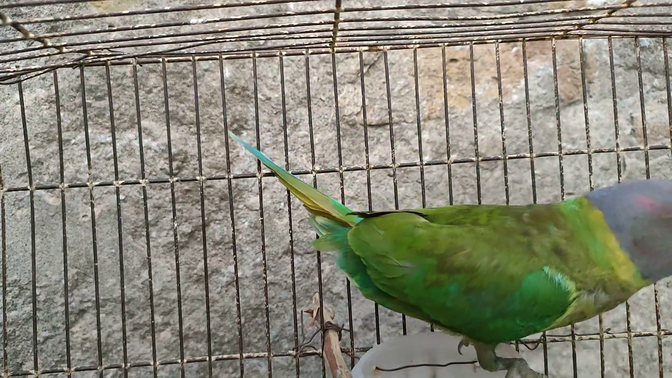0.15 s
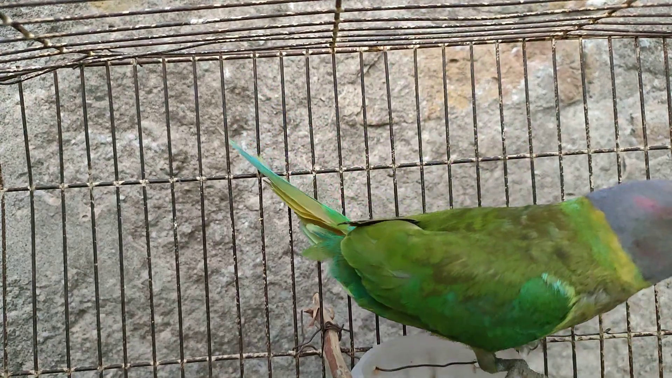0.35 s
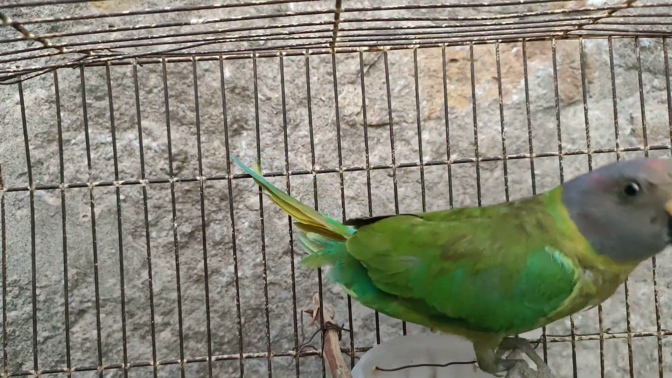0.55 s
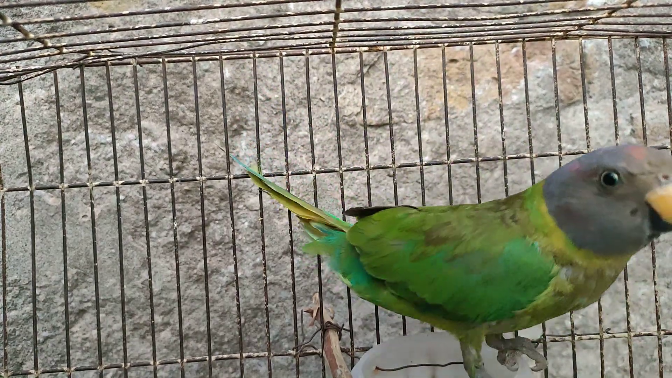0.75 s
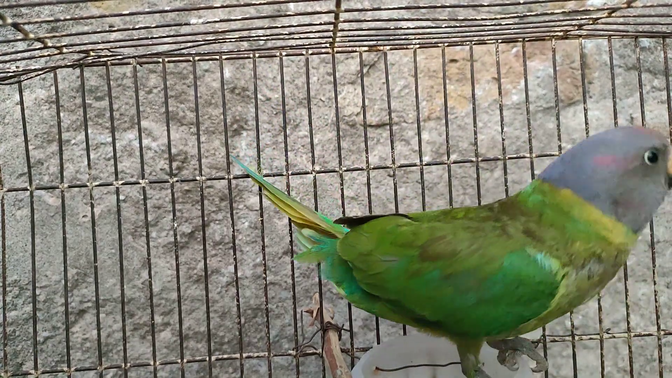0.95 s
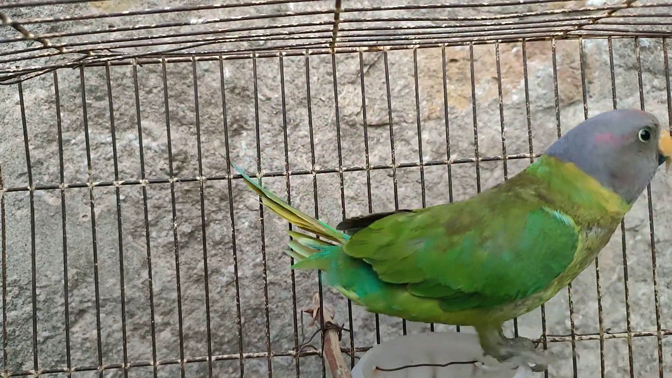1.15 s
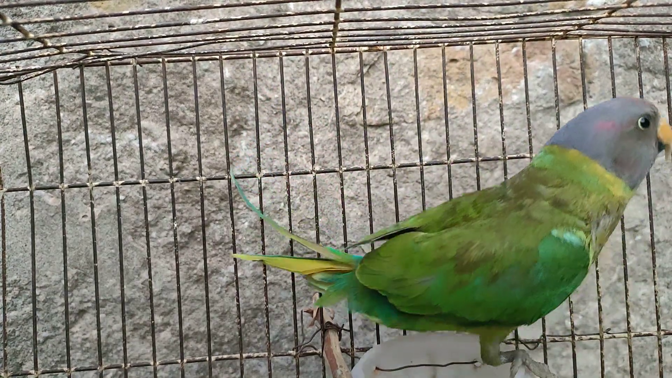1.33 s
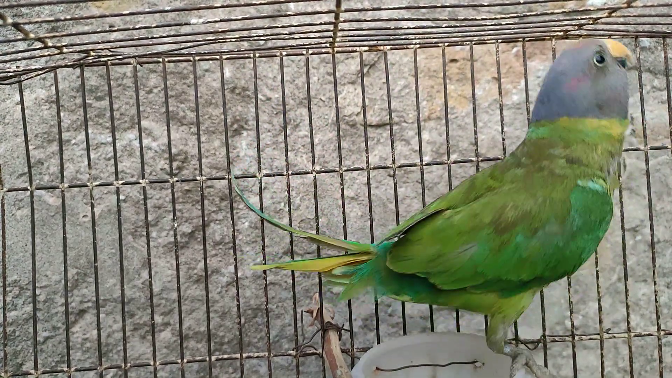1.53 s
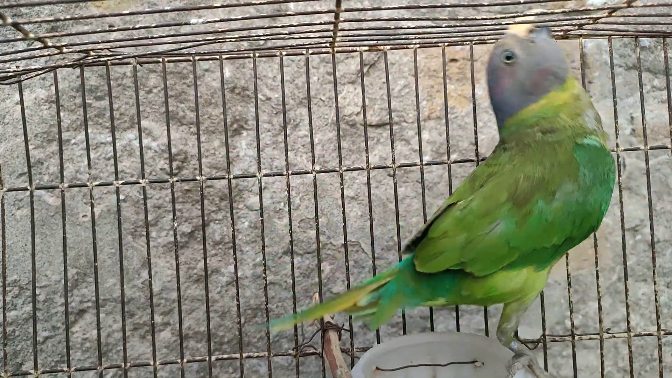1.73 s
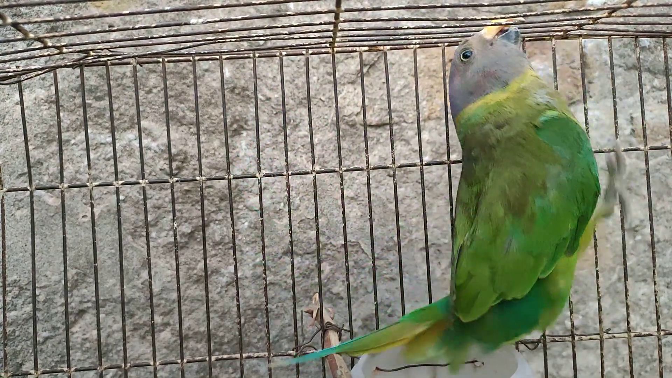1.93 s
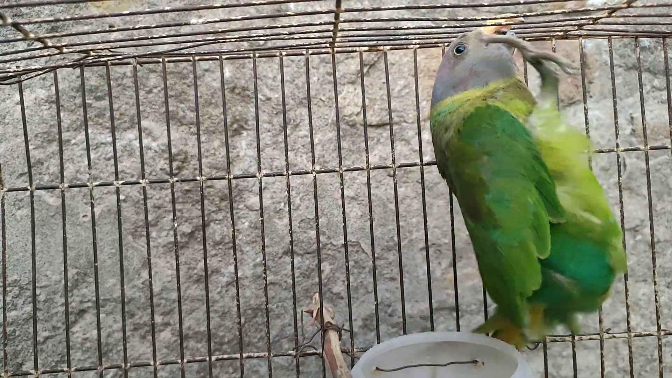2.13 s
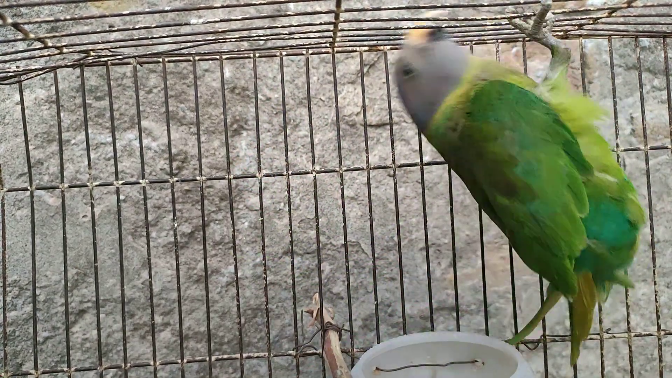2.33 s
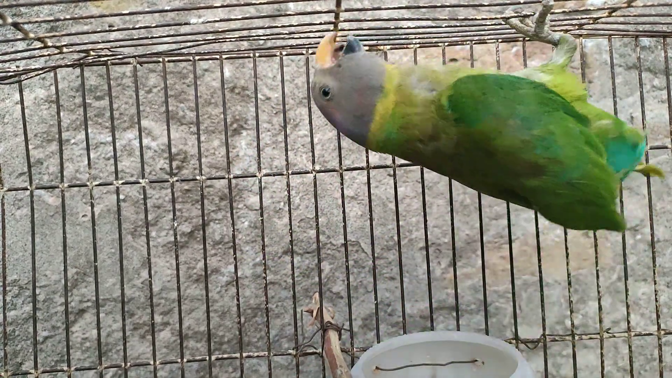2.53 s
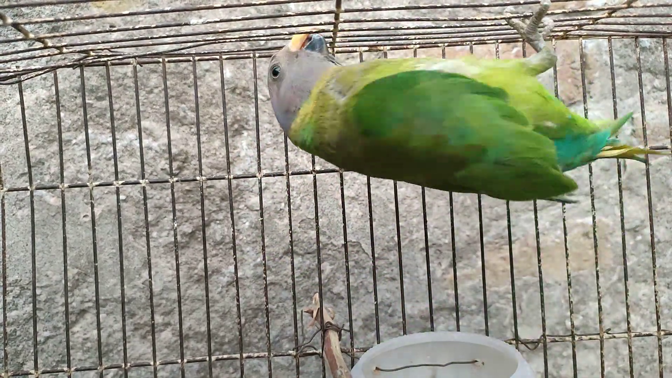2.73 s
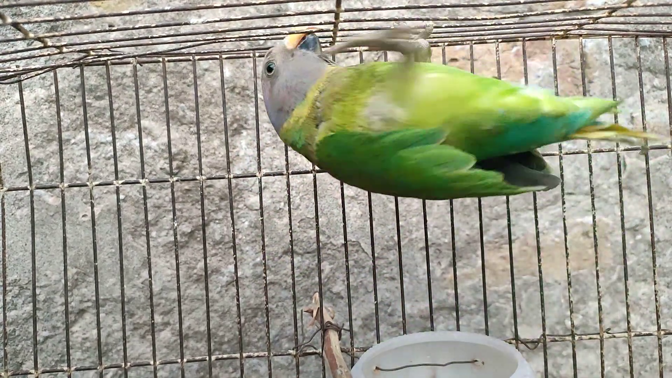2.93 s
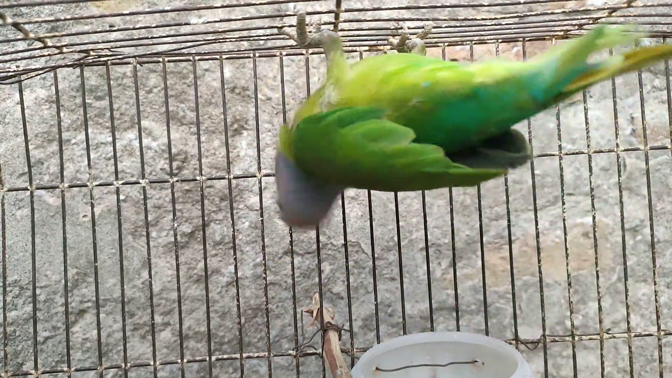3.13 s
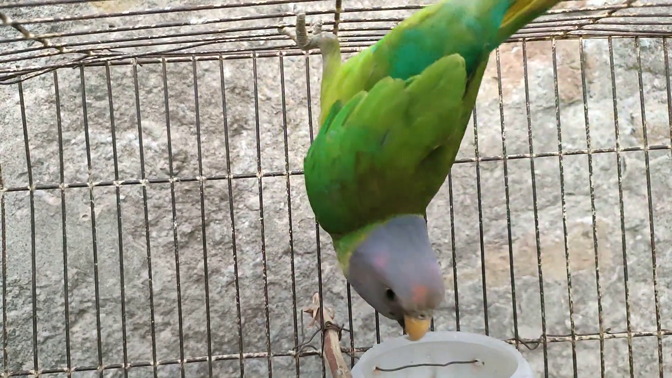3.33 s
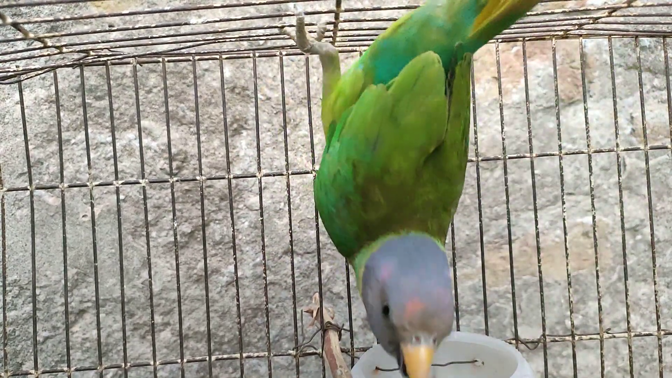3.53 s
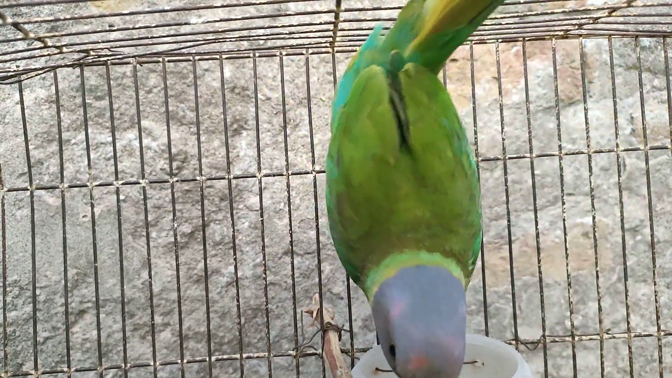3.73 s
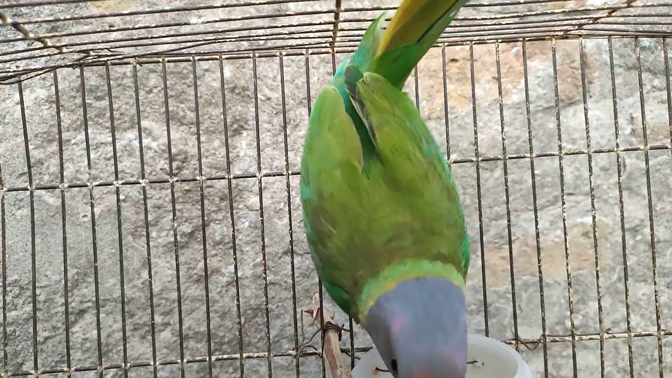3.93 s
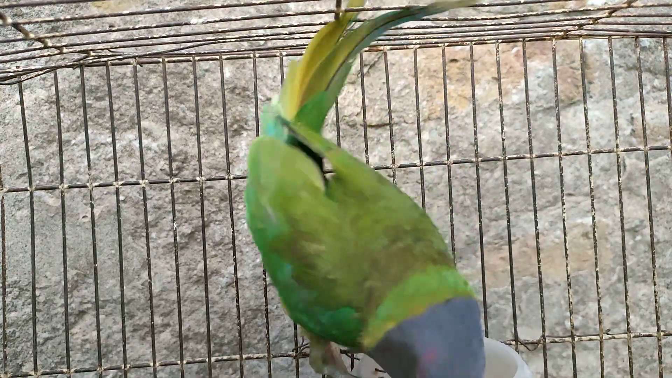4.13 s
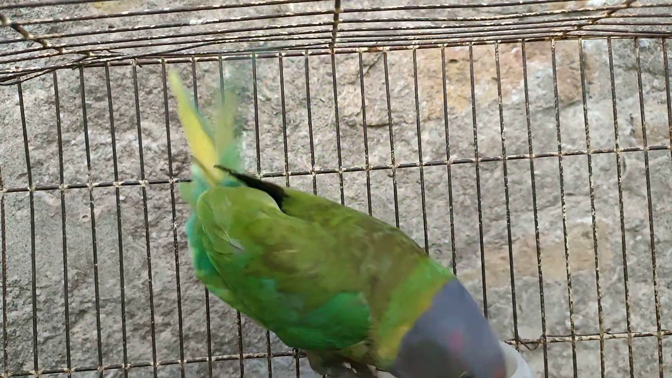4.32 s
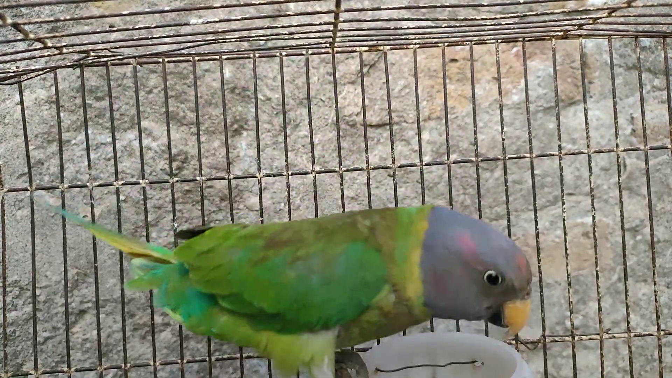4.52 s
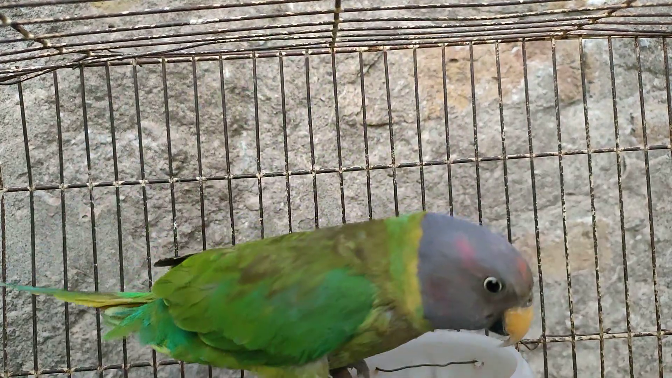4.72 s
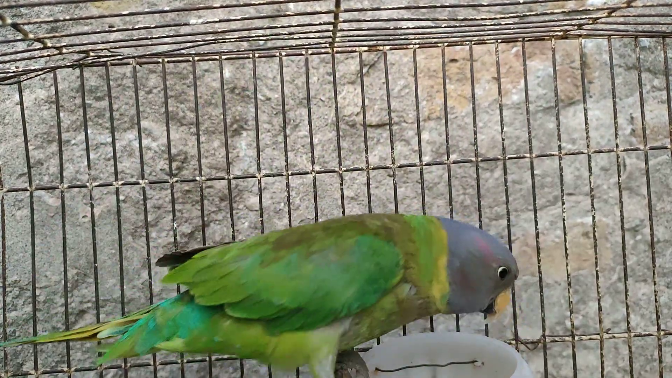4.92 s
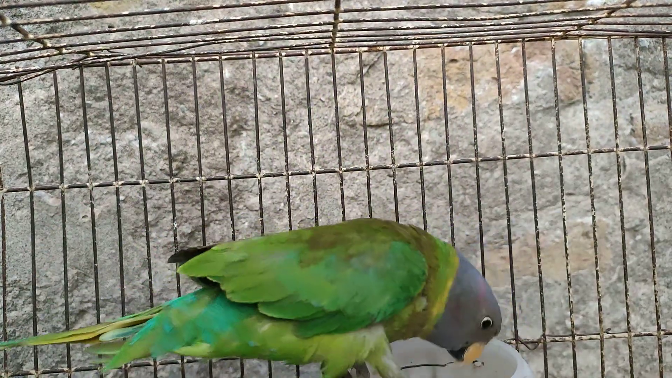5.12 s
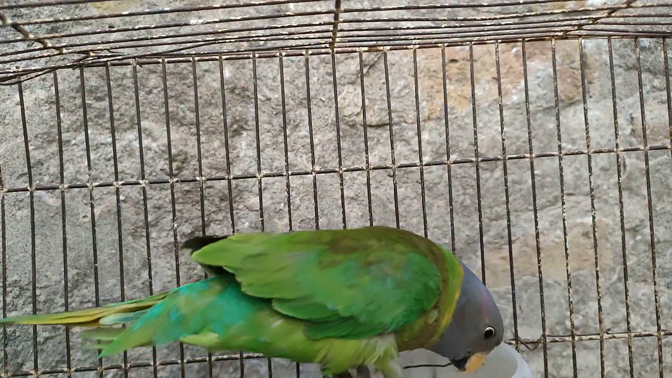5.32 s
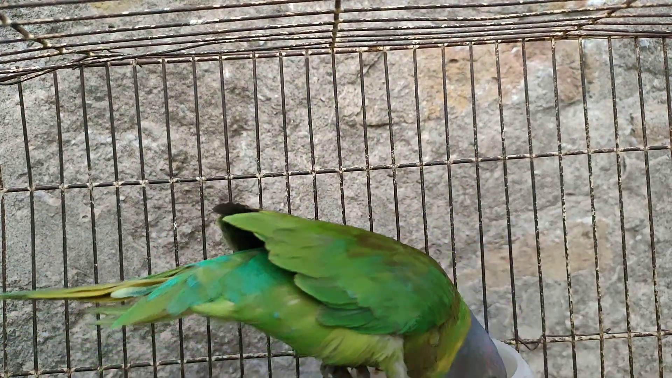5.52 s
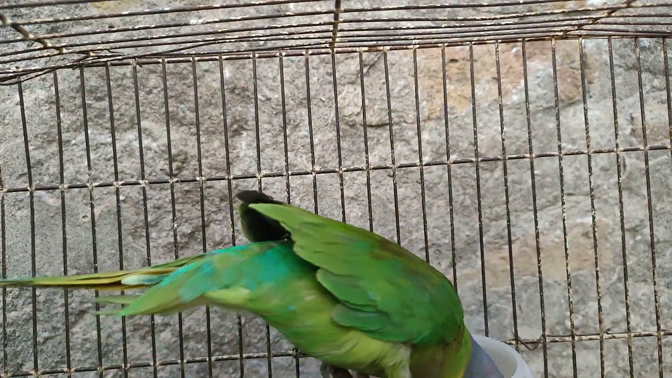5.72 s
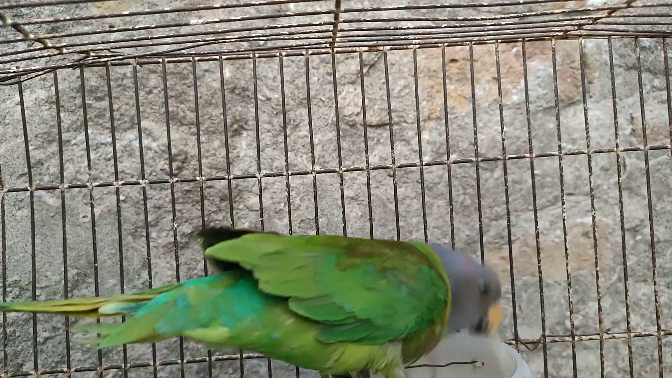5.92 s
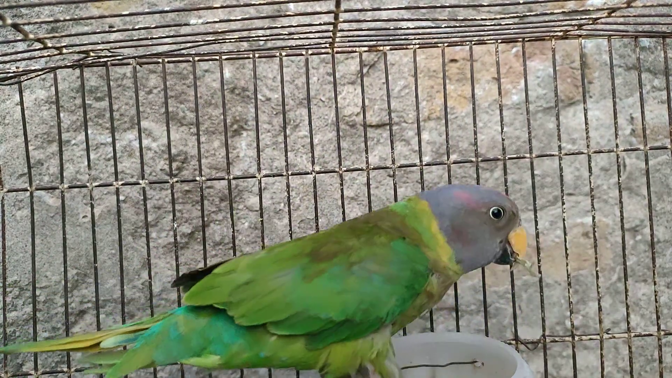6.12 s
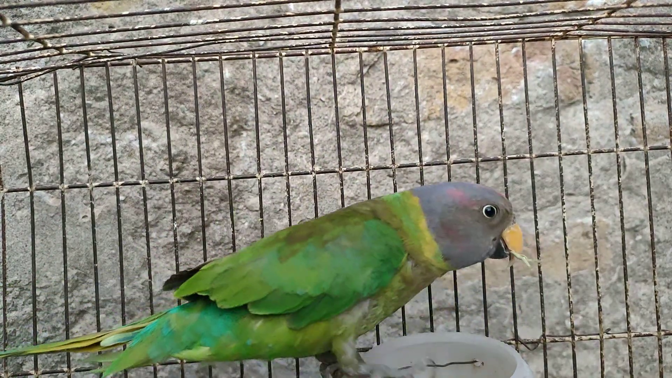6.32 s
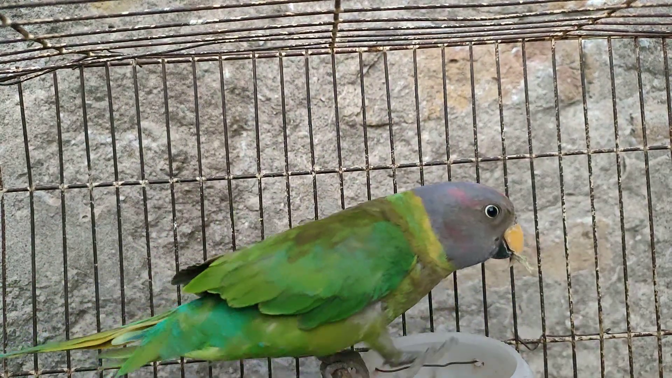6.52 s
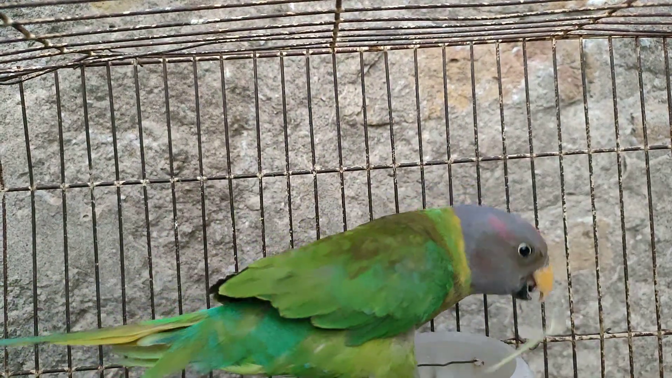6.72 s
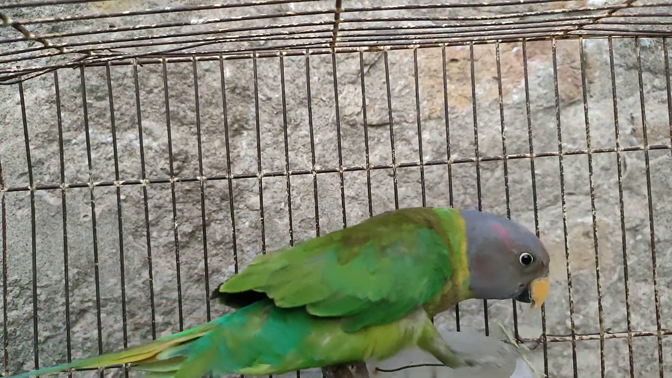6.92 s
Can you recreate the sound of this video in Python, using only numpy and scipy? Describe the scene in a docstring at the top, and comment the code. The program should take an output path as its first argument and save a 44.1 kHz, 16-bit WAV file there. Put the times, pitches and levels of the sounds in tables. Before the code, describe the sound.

Close, fairly dry metallic ticks and soft scratches come from a parakeet climbing the bars of its cage. Light clicks give way to rubbing on ringing wires, then a few firm knocks, and after a pause, quick clusters of ticks. Underneath, a deep hum grows through the middle and eases back. Brief, thin chirps from a small bird a little way off sound over quiet outdoor air.

```python
"""Sharp ticks and scratchy scuffs on wire: a parakeet climbs round its cage, close by, before a stone wall.
Beak and claws strike the wires and set bars and frame ringing; feet and feathers rub along them in tiny
slips, and one claw skids down a bar. Further off, a small bird whistles two phrases twice each, and a
very distant call arrives as echoes. Underneath, a low hum swells during the climb over a faint outdoor
wash."""
import sys
import numpy as np
from scipy import signal
from scipy.fft import rfft, irfft
from scipy.io import wavfile
from scipy.ndimage import uniform_filter1d

SR = 44100
rng = np.random.default_rng(int(sys.argv[2]) if len(sys.argv) > 2 else 0)


def dump_mix(stems):
    """Bounce the given channels to the path in sys.argv[1] as a 16-bit WAV at rate SR."""
    frames = np.atleast_2d(stems).T  # one column per channel
    limited = np.clip(frames, -1, 1)  # hard clip at full scale
    pcm = np.round(limited * 32767).astype(np.int16)
    wavfile.write(sys.argv[1], SR, pcm)


N = 311346
TIME = np.arange(N) / SR

# Beak and claw strikes:
# (time [s], strength [dB], weight [0-1], wire note [Hz], extra tick [dB], left over right [dB])
STRIKES = [(0.3083, -39.5, 0.17, 5620, -3, 2), (0.6368, -33.5, 0.12, 5710, 2, -0.5),
           (0.829, -43, 0.25, 5600, -8, 0), (0.8475, -48.5, 1, 5400, 6, 1), (0.854, -62, 0.65, 5500, 4, -2),
           (0.867, -31.5, 0.09, 5400, 0, 0), (1.2045, -51, 0.25, 6200, -4, 0),
           (1.3332, -56, .2, 5630, 7, -2), (1.3374, -35.5, 0.15, 5850, 5, 0),
           (1.3866, -41, 0.36, 4200, -2, 4), (1.395, -51, 0.45, 5200, -3, -6),
           (1.8313, -41.5, 0.85, 5150, 1, 2), (1.977, -52.5, 0, 5920, 6, -4),
           (3.7333, -27.5, 0.9, 3900, -1, 1), (3.764, -45, 1, 4840, 6, 0), (3.7836, -46, 0.56, 5170, 2, 2),
           (3.7876, -33.5, 0.87, 5340, 1, 2), (3.8036, -26.5, 0.67, 3750, -2.5, 1),
           (4.079, -58, 0.6, 5600, 15, 0), (4.235, -34, 0.82, 4500, 7, 1.5),
           (4.3178, -20, 0.83, 4740, -3, 2.5), (4.388, -50, 0.33, 5500, 3, 0),
           (4.41, -49, .25, 5400, -1, 0), (4.457, -43.5, 0.31, 3780, 7, 1.5),
           (4.493, -31, 0.24, 5500, 1.5, 0.5), (4.582, -52, 0.5, 5650, 8.5, 4),
           (5.2787, -42, 0.15, 5340, -1, 1), (5.765, -54.5, 1, 3950, -5, 8), (6.0395, -54, 0.1, 5800, 4, 2),
           (6.055, -40, 0.1, 5670, 1, 1), (6.063, -39.5, 0.33, 5040, -4, 2),
           (6.0717, -42, 0.27, 5700, 0, 2), (6.081, -38, 0.24, 6030, 3, 1), (6.109, -46, 0.2, 5800, -3, -3),
           (6.114, -42, 0.1, 5660, -4, 8), (6.1375, -34, 0.04, 5700, -0.5, 2),
           (6.1513, -38.5, 0.34, 6100, 0, -1), (6.7448, -37.5, 0.52, 3930, -1.5, 4.5),
           (6.778, -46.5, 1, 3600, 2, 11), (6.788, -59, 0.5, 5000, 9, 4), (6.929, -40.5, 0.4, 5200, -6, -2),
           (6.9403, -40, 0.76, 4730, -1, -3), (6.9535, -40.5, 0.46, 4900, 1.5, 0)]
# Light strikes ring one wire, firmer ones clack the bars, heavy ones knock the frame:
# (weight [0-1], wire ring [dB], bar clack [dB], frame knock [dB], tick [dB], rattle [dB])
STRIKE_MIX = [(0, 1, -17.5, -28.5, -17, -34), (.5, -5.5, -0.5, -16, -15, -25),
              (.8, -10.5, -3, -9.5, -25, -13), (1, -14, -3, -1.5, -27, -14)]

def strikes(chatter_s=0.0042, chatter_gain=0.27, buzz_s=0.014, buzz_db=-27, detune=0.0051,
            note_width_hz=650, note_db=7.0, damping_db=12, rattle_s=0.022, size=8192):
    """A snap and brief chatter set wire, bars and frame ringing; heavy strikes leave the bars rattling."""
    out, t, hz = np.zeros((2, N)), np.arange(size) / SR, np.fft.rfftfreq(size, 1 / SR)
    wire_band, bar_band = band(hz, 5260, 6370, 12.6, 15.4), band(hz, 3380, 4930, 3.6, 9.3)
    frame_band, tick_band = band(hz, 800, 2100, 1.1, 5.0), band(hz, 7080, 8700, 6.8, 2.9)
    rattle_band = band(hz, 4550, 5700, 10.7, 21.5)
    chatter = chatter_gain * (np.exp(-(t / chatter_s) ** 1.44) + amp(buzz_db) * np.exp(-t / buzz_s))
    attack_samples = SR // 110
    for at_s, strength_db, weight, note_hz, tick_db, left_db in STRIKES:
        drive = stereo_noise(size, shared_gain=0.67) * chatter
        snap = np.interp(weight, [0, 1], [2.6, 1.2])  # light claws snap most sharply
        drive[[0, 1], rng.integers(0, 5, 2)] += snap
        wires = cage_response(hz, detune, ripple_db=1.5, spacing_hz=197.6)
        # The claw damps its wire to a broad note, more so under weight.
        wires *= resonances([(note_hz, note_width_hz, note_db - damping_db * weight)], hz)
        *parts_db, rattle_db = strength_db + touch_levels(STRIKE_MIX, weight) + [0, 0, 0, tick_db, 0]
        pan = amp([[left_db / 2], [-left_db / 2]])
        for part, db in zip([wire_band, bar_band, frame_band, tick_band], parts_db):
            tone = ring(drive, part * wires)
            attack_rms = rms(tone[:, :attack_samples], axis=1, keepdims=True)
            add(out, at_s, amp(db) * pan * tone / attack_rms)
        shake = rng.standard_normal((2, size)) * amp(-drift(size, 250))
        rattle = unit_rms(ring(shake, rattle_band * wire_ripple(hz, 5.5, 130)))
        add(out, at_s, amp(rattle_db) * pan * rattle * np.exp(-t / rattle_s))
    return out


# Cage resonances: (frequency [Hz], width [Hz], peak gain [dB])
CAGE_MODES = [(667, 170, 2.5), (1105, 110, 19), (1420, 62, 12), (1640, 130, -9.5), (2960, 180, 7.5),
              (3350, 110, -1), (3930, 300, 9), (4530, 150, -0.5), (4740, 260, 2), (4940, 110, 5),
              (5250, 140, 6), (5630, 300, 6), (5950, 270, -1.5), (6970, 600, 1.5), (7800, 160, -9),
              (9870, 430, 0), (11300, 1200, -6.5)]

def cage_response(hz, detune, ripple_db, spacing_hz):
    """The cage's modes and those of the touched wire; no two wires are tuned alike."""
    detuned_hz = hz * (1 + detune * rng.standard_normal())
    return resonances(CAGE_MODES, detuned_hz) * wire_ripple(detuned_hz, ripple_db, spacing_hz)


def wire_ripple(hz, ripple_db, spacing_hz):
    """Gain of the many small treble resonances of one wire."""
    knots_hz = np.arange(0, SR / 2, spacing_hz)
    heights = np.clip(rng.standard_normal(1024), -2, 2)
    bumps = np.interp(hz, knots_hz, np.resize(heights, len(knots_hz)))
    return amp(ripple_db * bumps * band(hz, 2500, SR, 1.6, 0.88))


# Feet and feathers on the wires: (time [s], length [s], strength [dB], pressure [0-1], roof ring [dB])
SCUFFS = [(0.015, 0.064, -49.5, 0.25, -11), (0.659, 0.086, -62, 0.1, -25), (0.756, 0.057, -54, 0.14, -25),
          (1.217, 0.025, -62, 0.23, -22), (1.396, 0.045, -65, .5, -29), (1.528, 0.056, -61.5, 0.66, -20),
          (1.828, 0.021, -49, 1, -1), (1.878, 0.098, -53, 0.69, -13), (2.056, 0.091, -53, 0.39, -20),
          (2.134, 0.065, -55, 0.2, -20), (2.248, 0.032, -56.5, 0.28, -14),
          (2.357, 0.027, -54.5, 0.27, -2.5), (2.438, 0.043, -45, 0.72, -9), (2.526, 0.041, -43.5, 0.8, -22),
          (2.597, 0.11, -54, 0.87, -20), (2.648, 0.016, -56, 0.35, -18), (2.687, 0.1, -53.5, 0.73, -14),
          (2.963, 0.032, -63, 0.23, -19), (3, 0.034, -52, 0.33, -4), (3.178, 0.032, -49, 1, -1),
          (3.68, 0.027, -51, 0.3, -27), (3.801, 0.0073, -46, 0.9, -20), (3.845, 0.078, -57.5, 0.55, -13),
          (3.989, 0.12, -58, 0.63, -25), (4.12, 0.22, -58, 0.49, -25), (4.351, 0.12, -55.5, 0.59, -25),
          (6.16, 0.087, -64.5, 0.5, -25), (6.259, 0.043, -62.5, 0.55, -25), (6.301, 0.1, -56, 0.4, -23),
          (6.448, 0.4, -65.5, 0.64, -25), (6.78, 0.024, -54.5, 0.8, -14)]
# Light brushes are thin and fizzy, hard rubs full and dull:
# (pressure [0-1], scrape [dB], rustle [dB], fizz [dB])
SCUFF_MIX = [(0, 1.5, -20, -24), (0.501, -3.5, 2, -6.5), (1, -4, 4.5, -34)]

def scuffs(slips_per_s=2600, crackle_db=1.5, steady_friction=0.46, brush_rise_s=0.012, rub_rise_s=0.0048,
           sag=0.18, fade_s=0.036, flutter_db=0.8, ringing=0.38, detune=0.023, size=20480):
    """Rubbing is a fluttering run of tiny slips that swells, sags and keeps the wires ringing."""
    out, t, hz = np.zeros((2, N)), np.arange(size) / SR, np.fft.rfftfreq(size, 1 / SR)
    bands = [band(hz, 4030, 6140, 10.4, 11.2), band(hz, 337, 3670, 5.3, 6.5),
             band(hz, 5700, 13500, 5.3, 3.0)]
    for at_s, length_s, strength_db, pressure, roof_db in SCUFFS:
        grip = amp(crackle_db * np.minimum(rng.exponential(1, size), 2.6))  # a few slips snap harder
        slips = grip * (rng.random(size) < slips_per_s / SR) + steady_friction
        friction = stereo_noise(size, shared_gain=0.31) * slips
        swell = 1 - np.exp(-t / np.interp(pressure, [0, 1], [brush_rise_s, rub_rise_s]))
        fade = np.exp(-sag * t / length_s - np.maximum(t - length_s, 0) / fade_s)
        drive = friction * swell * fade * amp(flutter_db * drift(size, 70))
        wires = cage_response(hz, detune, ripple_db=9.5, spacing_hz=139.9)
        wires **= ringing * band(hz, 1700, SR, 0.42, 0.89)  # a rub barely stirs the heavy frame
        scrape, rustle, fizz = (ring(drive, part * wires) for part in bands)
        parts_db = strength_db + touch_levels(SCUFF_MIX, pressure)
        for tone, db in zip([scrape, rustle, flicker(fizz)], parts_db):
            add(out, at_s, amp(db) * tone / rms(tone[:, t < max(length_s, 0.01)]))
        roof = roof_wires(t, pressure, length_s)
        add(out, at_s, amp(strength_db + roof_db) * roof / rms(roof[:, t < length_s + fade_s]))
    return out


def flicker(fizz, depth_db=5.0, grain_db=1.5, grain_hz=350, size=256):
    """The fizz of a rub is grainy and flickers in small patches of time and pitch."""
    count = fizz.shape[1]
    grainy = fizz * amp(grain_db * drift(count, grain_hz))
    _, _, spectra = signal.stft(grainy, SR, nperseg=size)
    patches = blur(rng.standard_normal(spectra.shape[1:]), rows=3, columns=8)
    return signal.istft(spectra * amp(depth_db * np.clip(patches, -2, 2)), SR, nperseg=size)[1][:, :count]


# Modes of the long roof wires: (frequency [Hz], relative level [dB], t60 [s])
ROOF_MODES = [(1140, 4, 0.18), (1720, 3.5, 0.22), (2300, -5.5, 0.18), (2810, -8, .2), (4000, 3, 0.17),
              (5210, 1.5, 0.14), (5800, -5, 0.18), (6930, -4.5, 0.18)]

def roof_wires(t, pressure, length_s, rise_s=0.006, hold_fraction=0.6, detune=0.003, neighbour_db=-6,
               tilt_db_per_octave=8):
    """A wire and its neighbour swell under the foot, beat and ring out; a light touch favours high modes."""
    neighbour = [(hz, db + neighbour_db, t60_s) for hz, db, t60_s in ROOF_MODES]
    hz, db, t60_s = np.transpose(ROOF_MODES + neighbour)[:, :, None]
    hz = hz * (1 + detune * rng.standard_normal(hz.shape))
    tilt_db = tilt_db_per_octave * (1 - pressure) * np.log2(hz / hz[0])
    decay_db = 60 * np.maximum(t - hold_fraction * length_s, 0) / t60_s
    modes = amp(db + tilt_db - decay_db) * np.exp(2j * np.pi * hz * t)
    stereo_phases = np.exp(2j * np.pi * (rng.random(len(hz)) + 0.35 * rng.random((2, len(hz)))))
    return (stereo_phases @ modes).real * (1 - np.exp(-t / rise_s))


# Claw slide into the hardest landing: (time [s], length [s], final strength [dB])
SKID = (4.254, 0.064, -34)
# Resonances of that bar: (frequency [Hz], width [Hz], peak gain [dB])
BAR_MODES = [(3930, 250, 3), (5000, 700, -3), (5800, 250, -3), (7050, 400, 4)]

def skid(swell_db=9, stop_s=0.005, judder_db=0.5, judder_hz=260, pan_db=1.0, size=8192):
    """A claw judders down a bar, growing louder until the foot lands."""
    out, t, hz = np.zeros((2, N)), np.arange(size) / SR, np.fft.rfftfreq(size, 1 / SR)
    at_s, length_s, strength_db = SKID
    drive = stereo_noise(size, shared_gain=0.6) * amp(judder_db * drift(size, judder_hz))
    bar = band(hz, 3800, 5860, 13.0, 11.5) * resonances(BAR_MODES, hz) * wire_ripple(hz, 4.5, 130)
    rasp = unit_rms(ring(drive, bar))
    swell = amp(swell_db * np.minimum(t / length_s - 1, 0))
    stop = np.exp(-np.maximum(t - length_s, 0) / stop_s)
    add(out, at_s, amp([[strength_db + pan_db], [strength_db - pan_db]]) * rasp * swell * stop)
    return out


# Notes of the small bird's phrases: (offset [s], length [s], start [Hz], end [Hz], relative level [dB])
RISING_PHRASE = [(0.002, 0.024, 3940, 3320, -49.5), (0.044, .025, 4780, 4250, -56.5),
                 (0.07, 0.041, 3490, 3380, -53.5), (0.116, .168, 4020, 5800, -50.5)]
FALLING_PHRASE = [(0.012, 0.032, 3750, 3780, -47), (0.054, 0.066, 6910, 5750, -50.5),
                  (0.096, .036, 5300, 4400, -49)]
# Its song: (phrase, time [s], gain [dB], glide depth [ratio], note stretch [ratio])
SONG = [(RISING_PHRASE, 0.336, 0, 0.95, 0.99), (FALLING_PHRASE, 2.727, -0.5, 0.94, 0.82),
        (RISING_PHRASE, 3.408, -0.86, .7, .84), (FALLING_PHRASE, 6.283, -0.24, 0.97, 0.97)]
# Its single calls: (time [s], length [s], start [Hz], end [Hz], relative level [dB])
SINGLE_CALLS = [(3.013, 0.068, 2630, 2700, -59), (6.254, 0.022, 4700, 4670, -55),
                (6.265, 0.015, 3880, 3690, -51), (6.478, 0.017, 3970, 3750, -55),
                (6.688, 0.083, 2430, 2416, -63)]

def small_bird(gain_db=0.5, pan_db=1.0, lag_samples=20):
    """Whistled notes come from the right, so they reach the left later and softer."""
    out = np.zeros((2, N))
    notes = [(at_s + offset_s, stretch * length_s, start_hz, start_hz + depth * (end_hz - start_hz),
              db + phrase_db)
             for phrase, at_s, phrase_db, depth, stretch in SONG
             for offset_s, length_s, start_hz, end_hz, db in phrase]
    for at_s, length_s, start_hz, end_hz, db in notes + SINGLE_CALLS:
        tone = amp(db + gain_db) * whistle(length_s, start_hz, end_hz)
        stereo = np.array([np.pad(tone, (lag_samples, 0)), np.pad(tone, (0, lag_samples))])
        add(out, at_s, stereo * amp([[-pan_db], [pan_db]]))
    return out


def whistle(length_s, start_hz, end_hz, ease=0.6, taper=0.47, flutter_db=3.2):
    """One husky note swells and fades, gliding fastest in the middle."""
    progress = np.linspace(0, 1, round(length_s * SR))
    glide = progress - ease * np.sin(2 * np.pi * progress) / (2 * np.pi)
    waver = np.interp(length_s, [0.025, 0.08], [0.05, 0.025])  # short notes are roughest
    pitch_hz = (start_hz + (end_hz - start_hz) * glide) * (1 + waver * drift(len(progress), 300))
    envelope = amp(flutter_db * drift(len(progress), 150)) * signal.windows.tukey(len(progress), taper)
    return unit_rms(envelope * np.sin(2 * np.pi * np.cumsum(pitch_hz) / SR))


# Slide and held note of a distant call: (time [s], length [s], start [Hz], end [Hz], fundamental [dB])
FAR_CALL = [(1.041, 0.072, 784, 962, -62), (1.085, 0.11, 967, 1003, -63.5)]

def far_call(octave_db=3.0):
    """A very distant call slides up and holds; only its echoes arrive."""
    out = np.zeros((2, N))
    for at_s, length_s, start_hz, end_hz, db in FAR_CALL:
        fundamental = whistle(length_s, start_hz, end_hz)
        octave = amp(octave_db) * whistle(length_s, 2 * start_hz, 2 * end_hz)
        add(out, at_s, amp(db) * (fundamental + octave)[None])
    return wall_echoes(out, t60_s=0.55, treble_t60_s=0.2, gap_s=0.003)


# Swell of the hum: (time [s], level [dB])
HUM_LEVEL = [(0.0, -43.5), (0.51, -54), (0.79, -43), (1.45, -45.5), (1.71, -29), (2.63, -27.5), (2.85, -30),
             (3.23, -24.5), (3.5, -31.5), (3.78, -25.5), (3.99, -25.5), (4.15, -31.5), (4.38, -24.5),
             (4.48, -24.5), (4.56, -35.5), (4.72, -37), (5.19, -35), (5.52, -41), (5.86, -37.5),
             (6.11, -40.5), (6.61, -36), (6.86, -42.5), (7.04, -37.5), (7.06, -43)]
# Its upward creep: (time [s], pitch [Hz])
HUM_PITCH = [(0, 48.7), (1.0, 49.25), (1.7, 50.76), (7.06, 50.93)]

def hum(waver_db=0.6, octave_offset_db=-41, octave_tracking=0.42, rumble_db=-24):
    """A low, centred hum wavers and swells together with a rumble; its octave swells less."""
    phase = 2 * np.pi * np.cumsum(curve(HUM_PITCH)) / SR
    level_db = curve(HUM_LEVEL) + waver_db * drift(N, 12)
    fundamental = amp(level_db) * np.sin(phase)
    octave = amp(octave_offset_db + octave_tracking * level_db) * np.sin(2 * phase)
    rumble = coloured(rng.standard_normal(N), band(np.fft.rfftfreq(N, 1 / SR), 41, 62, 3.8, 2.95))
    return np.sqrt(2) * (fundamental + octave) + amp(level_db + rumble_db) * rumble


# Outdoor noise spectrum: (frequency [Hz], relative density [dB])
WASH_SPECTRUM = [(15, -7), (60, -11), (110, -3.5), (150, -1), (220, -3), (290, -7.5), (400, -9),
                 (482, -6.5), (570, -7), (900, -6), (1150, -10.5), (1650, -11), (2800, -16), (4400, -20.5),
                 (7000, -35), (10000, -52.5), (16000, -60)]
# Its loudness: (time [s], level [dB])
WASH_LEVEL = [(0, -49), (1.2, -49), (2.5, -47.5), (3.6, -48.5), (4.6, -49), (5.6, -49.5), (6.3, -49.5),
              (7.06, -49)]
# Its left-right likeness: (frequency [Hz], coherence [0-1])
WASH_COHERENCE = [(60, 0.96), (130, 0.94), (300, 0.54), (500, 0.72), (900, 0.77), (1500, 0.3), (4000, 0.25),
                  (9000, 0.41)]

def outdoor_wash(lag_s=0.0004, patch_db=1.83, pan_db=0.2, size=1024):
    """Distant outdoor noise in drifting patches, mostly from the right."""
    frames, hz = N // (size // 4) + 5, np.fft.rfftfreq(size, 1 / SR)
    noise = rng.standard_normal((5, frames, len(hz)))
    right, diffuse = noise[0] + 1j * noise[1], noise[2] + 1j * noise[3]
    patches = blur(noise[4], rows=16, columns=8)
    coherence = np.clip(over_log_hz(WASH_COHERENCE, hz), 0, 1)
    delay_s = lag_s * band(hz, 573, SR, 4.9, 4)  # the bass comes from all round
    left = coherence * right * np.exp(-2j * np.pi * hz * delay_s) + np.sqrt(1 - coherence ** 2) * diffuse
    spectra = np.array([left, right]) * amp(over_log_hz(WASH_SPECTRUM, hz) + patch_db * patches)
    _, wash = signal.istft(spectra.transpose(0, 2, 1), nperseg=size, noverlap=size - size // 4)
    return unit_rms(wash[:, :N]) * amp(curve(WASH_LEVEL)) * amp([[-pan_db], [pan_db]])


# Tones in the wash: (centre [Hz], width [Hz], level [dB])
DRONES = [(159, 28, -65.5), (483, 26, -62.5)]

def drones(spread=0.56):
    """Narrow bands of noise hang in the wash as faint, unsteady tones."""
    hz, out = np.fft.rfftfreq(N, 1 / SR), np.zeros((2, N))
    for centre_hz, width_hz, db in DRONES:
        shared, *sides = rng.standard_normal((3, N))
        out += amp(db) * coloured(shared + spread * np.array(sides), peak(hz, centre_hz, width_hz))
    return out


def wall_echoes(x, t60_s, treble_t60_s, gap_s, echoes_per_s=3000, size=SR // 2):
    """Sparse echoes off stone; the treble dies sooner."""
    taps = rng.standard_normal((2, size)) * (rng.random((2, size)) < echoes_per_s / SR)
    taps *= np.arange(size) / SR > gap_s
    hz, t, spectra = signal.stft(taps, SR, nperseg=256)
    decay_s = over_log_hz([(4500, t60_s), (11000, treble_t60_s)], hz)[:, None]
    _, tail = signal.istft(spectra * amp(-60 * t / decay_s), SR, nperseg=256)
    return signal.fftconvolve(x, tail / np.linalg.norm(tail, axis=1, keepdims=True), axes=1)[:, :N]


def amp(db):
    return 10 ** (np.asarray(db) / 20)


def rms(x, **axes):
    return np.sqrt(np.mean(x ** 2, **axes) + 1e-20)


def unit_rms(x):
    return x / rms(x)


def curve(points):
    return np.interp(TIME, *np.transpose(points))


def over_log_hz(points, hz):
    knots_hz, values = np.transpose(points)
    return np.interp(np.log(hz + 1), np.log(knots_hz), values)


def touch_levels(table, touch):
    """Level in dB of each part of a sound, for a touch from light (0) to heavy (1)."""
    knots, *parts = np.transpose(table)
    return np.array([np.interp(touch, knots, part) for part in parts])


def add(mix, at_s, sound):
    span = mix[:, max(round(at_s * SR), 0):][:, :sound.shape[1]]
    span += sound[:, :span.shape[1]]


def stereo_noise(count, shared_gain):
    shared, *sides = rng.standard_normal((3, count))
    return shared_gain * shared + np.array(sides)


def coloured(noise, gain):
    return unit_rms(irfft(rfft(noise) * gain, noise.shape[-1]))


def drift(count, rate_hz):
    """Smooth random motion of rms 1."""
    hz = np.fft.rfftfreq(count, 1 / SR)
    return coloured(rng.standard_normal(count), 1 / (1 + (hz / rate_hz) ** 4))


def blur(grid, rows, columns):
    return unit_rms(uniform_filter1d(uniform_filter1d(grid, rows, axis=0), columns, axis=1))


def band(hz, lo_hz, hi_hz, rise, fall):
    """Pass-band gain; the skirts go as the powers rise and fall of frequency."""
    return 1 / np.sqrt((1 + (lo_hz / (hz + 1)) ** (2 * rise)) * (1 + (hz / hi_hz) ** (2 * fall)))


def peak(hz, centre_hz, width_hz):
    return 1 / (1 + (2 * (hz - centre_hz) / width_hz) ** 2)


def resonances(modes, hz):
    return 1 + sum(amp(db) * peak(hz, centre_hz, width_hz) for centre_hz, width_hz, db in modes)


def ring(x, gain):
    """Minimum-phase filter: it rings after a blow, never before."""
    log_gain = np.log(np.maximum(gain / gain.max(), 1e-5))
    mirrored = np.r_[log_gain, log_gain[-2:0:-1]]
    return irfft(rfft(x) * np.exp(signal.hilbert(mirrored).conj())[:len(gain)])


def scene():
    """The near cage is fairly dry, its ticks most of all; the far birds are blurred by echoes."""
    ticks, rubs, song = strikes(), skid() + scuffs(), small_bird()
    echo_send = amp(-16) * ticks + amp(-12) * rubs
    cage = ticks + rubs + wall_echoes(echo_send, t60_s=0.17, treble_t60_s=0.11, gap_s=0.0044)
    song_scatter = wall_echoes(song, t60_s=0.059, treble_t60_s=0.04, gap_s=0.001)
    song_tail = wall_echoes(song, t60_s=0.3, treble_t60_s=0.12, gap_s=0.004)
    bird = amp(-3.5) * song + amp(-8) * song_scatter + amp(-7) * song_tail
    return cage + bird + far_call() + hum() + drones() + outdoor_wash()


def record(dry):
    """A steep low-pass removes the highest treble."""
    cutoff_hz = 15900
    lowpass = signal.firwin(511, cutoff_hz, window=("kaiser", 9), fs=SR)
    return signal.oaconvolve(dry, lowpass[None], "same")


dry = scene()
out = record(dry)
dump_mix(out)
```